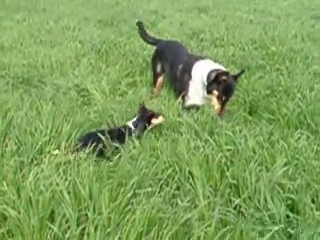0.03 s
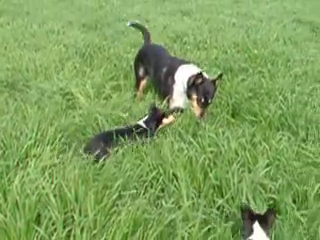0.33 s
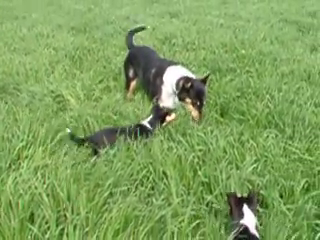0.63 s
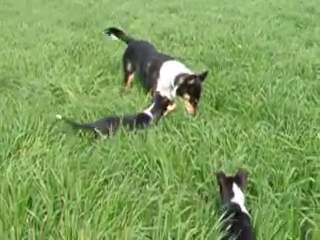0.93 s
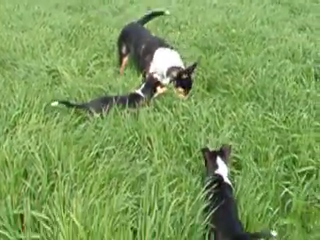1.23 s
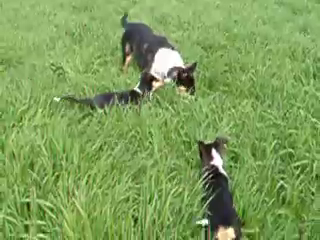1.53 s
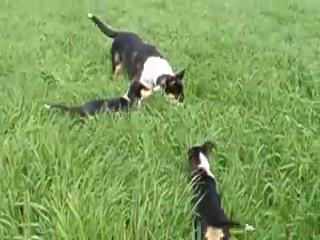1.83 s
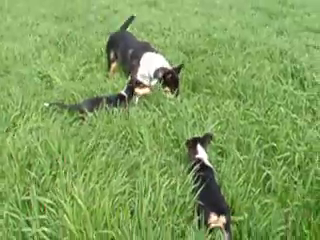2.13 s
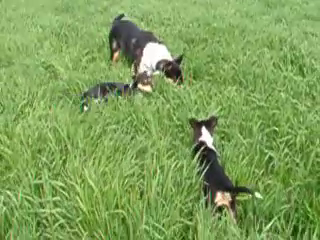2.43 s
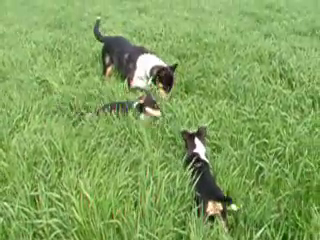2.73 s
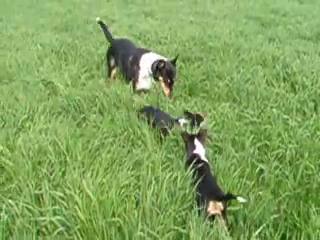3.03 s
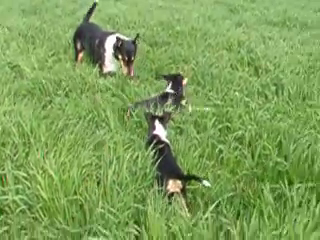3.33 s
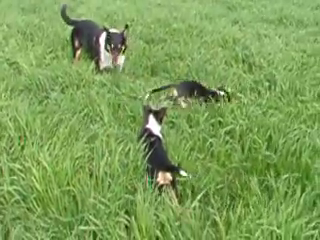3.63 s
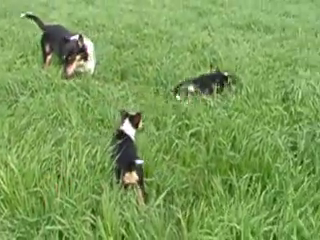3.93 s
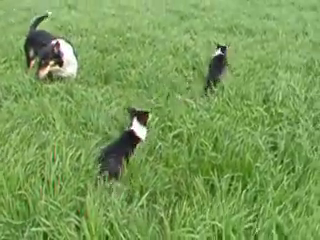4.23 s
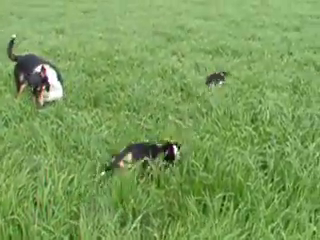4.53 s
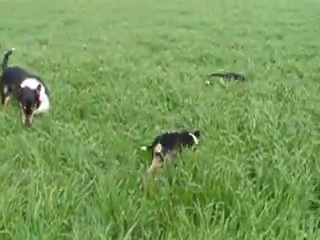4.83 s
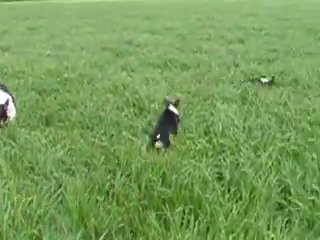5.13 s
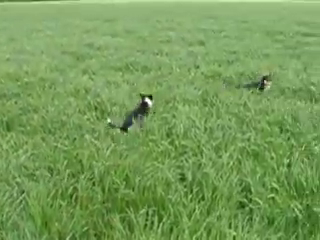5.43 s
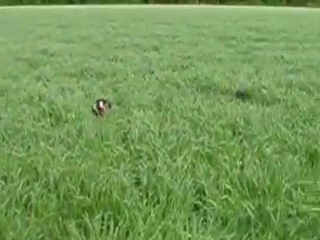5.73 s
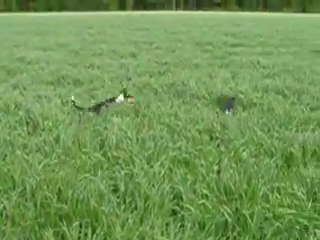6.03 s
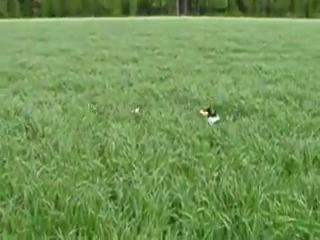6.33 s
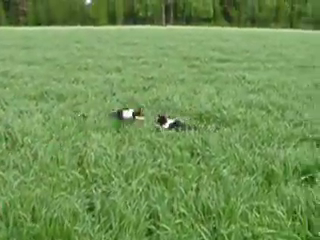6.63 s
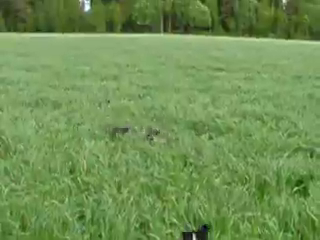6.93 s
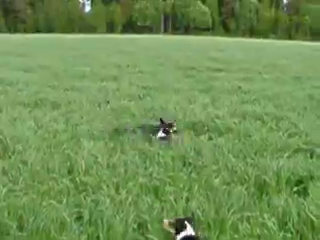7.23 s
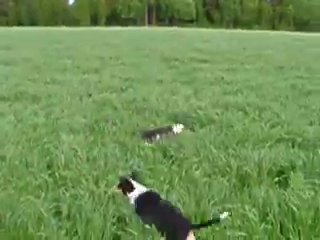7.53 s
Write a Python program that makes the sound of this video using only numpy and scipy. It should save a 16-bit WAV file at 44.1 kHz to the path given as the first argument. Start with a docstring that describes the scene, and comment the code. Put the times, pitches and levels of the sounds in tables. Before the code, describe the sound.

A quiet open field with an even hush, a faint far drone and a gritty hiss throughout. Dogs wade through tall grass, making soft, bright swishes in the first second, then thinner rustling until about 2.7 seconds. One faint, rising bird chirp sounds at 0.9 seconds. Small puffs of wind touch the microphone around 2 seconds, with low thumps near 3.1. From 4 to 5.3 seconds strong gusts rumble and buffet, the loudest sound, peaking at 4.6 and fading by 5.8. The grass keeps swishing with each stride, with scattered tiny stalk snaps, the clearest at 3.6 seconds. Soft, dull paw landings come between 5.4 and 7 seconds, and stronger swishes near 6.3 and 6.9 as the dogs bound. Light wind bumps return from 7 seconds until the end at about 7.6.

```python
"""Dogs wade and bound through tall grass: blades swish in countless tiny contacts, stalks snap,
paws land softly on turf. Gusts carry turbulence past the microphone, which rumbles and thumps.
Behind them: the hush of an open field, a far drone, one faint bird call.
The pocket camera's coarse converter adds a gritty hiss."""
import sys
import numpy as np
from scipy import signal
from scipy.fft import rfft, irfft, next_fast_len
from scipy.io import wavfile
from scipy.ndimage import uniform_filter1d, map_coordinates

SR = 44100
rng = np.random.default_rng(int(sys.argv[2]) if len(sys.argv) > 2 else 0)


def wav_out(sig):
    """Save sig, one row per channel (or a flat mono array), as 16-bit PCM at SR to the path in sys.argv[1]."""
    wavfile.write(sys.argv[1], SR, np.round(np.clip(np.atleast_2d(sig).T, -1, 1) * 32767).astype(np.int16))


N = 334719
TIME = np.arange(N) / SR


def from_db(db):
    """Decibels to gain."""
    return 10 ** (np.asarray(db) / 20)


def to_db(power):
    """Power to decibels."""
    return 10 * np.log10(power + 1e-20)


def rms_one(x):
    """Scale to rms 1."""
    return x / np.sqrt(np.mean(x ** 2) + 1e-20)


def in_time(rows):
    """Interpolate each column after t/s at every sample."""
    t_s, *columns = np.transpose(rows)
    return [np.interp(TIME, t_s, column) for column in columns]


def coloured(x, spectrum):
    """Shape x by rows of f/Hz, level/dB; rms 1."""
    hz, db = np.transpose(spectrum)
    size = next_fast_len(len(x))
    bins_hz = np.maximum(np.fft.rfftfreq(size, 1 / SR), 1)
    gain = from_db(np.interp(np.log(bins_hz), np.log(hz), db))
    return rms_one(irfft(rfft(x, size) * gain, size)[:len(x)])


def band_noise(band_hz):
    """Band-passed noise; rms 1."""
    band = signal.butter(2, band_hz, "band", fs=SR, output="sos")
    return rms_one(signal.sosfilt(band, rng.standard_normal(N)))


def drift(rate_hz):
    """Slow random wander; rms 1."""
    hop, settle = 40, 2000
    pole = np.exp(-2 * np.pi * rate_hz * hop / SR)
    noise = rng.standard_normal(N // hop + settle + 2)
    slow = signal.lfilter([1], [1, -2 * pole, pole ** 2], noise)[settle:]
    return np.interp(np.arange(N) / hop, np.arange(len(slow)), rms_one(slow))


def ring(clicks, hz, t60_s):
    """Resonator: a unit click starts a decaying unit sine."""
    r, w = from_db(-60 / (t60_s * SR)), 2 * np.pi * hz / SR
    return signal.lfilter([0, np.sin(w)], [1, -2 * r * np.cos(w), r * r], clicks + 1e-18)


def contacts(per_s, spread_db=2.0):
    """Tiny random touches of uneven strength; rms 1 at any rate."""
    chance = np.clip(per_s / SR, 1e-4, 1)
    sizes = from_db(spread_db * np.minimum(rng.exponential(1, N), 4)) * rng.choice([-1, 1], N)
    return rms_one(sizes * (rng.random(N) < chance) / np.sqrt(chance))


def field(hush_db=-53, waver_db=0.16, drone_band_hz=(370, 640)):
    """Even hush of breeze over the meadow; a dull far drone swells and sinks."""
    # breeze spectrum: f/Hz, level/dB
    hush_spectrum = [(20, -7), (70, -1.5), (160, 0), (300, -0.5), (540, -3), (800, -2.5), (1300, -4.5),
                     (2100, -5.5), (3200, -10), (6000, -16.5), (8000, -18), (10000, -51.5)]
    # drone envelope: t/s, level/dB
    drone_curve = [(0, -60.5), (.8, -63.5), (1.3, -61), (2.0, -57.5), (2.45, -58.5), (2.8, -63),
                   (4.0, -63.5), (6.0, -63), (7.59, -67)]
    hush = from_db(hush_db + waver_db * drift(3)) * coloured(rng.standard_normal(N), hush_spectrum)
    return hush + from_db(in_time(drone_curve)[0]) * band_noise(drone_band_hz)


def bird(gain_db=6.0):
    """One faint rising whistle from far trees."""
    # call contour: t/s, f/Hz, level/dB before gain
    chirp = [(.86, 3600, -81), (.878, 3400, -60), (.892, 3400, -60.5), (.9, 3900, -75), (.912, 4400, -53),
             (.93, 4850, -68), (.95, 5100, -89)]
    hz, db = in_time(chirp)
    calling = (TIME > chirp[0][0]) & (TIME < chirp[-1][0])
    return calling * from_db(db + gain_db) * np.sin(2 * np.pi * np.cumsum(hz) / SR)


def gust_db(calm_db=-60.0, rise_s=.011, fall_s=.014, inertia=.03):
    """Gusts rise out of the calm, hold and fall away; powers add."""
    # gusts: start/s, hold/s, relative level/dB
    gusts = [(1.399, 0.055, -51), (1.599, 0.038, -50), (2.059, .13, -49), (2.76, .21, -45.5),
             (3.1, 0.036, -32), (3.181, .11, -40), (3.77, .15, -44), (3.97, .57, -32), (4.029, 0.052, -26),
             (4.26, 0.079, -26), (4.35, 0.098, -23.5), (4.594, .014, -21), (4.641, .18, -28.5),
             (4.851, .07, -42), (5.029, .29, -33.5), (5.441, .36, -41.5), (5.979, .18, -54),
             (6.35, .1, -51), (6.82, .11, -45), (7.0, 0.053, -41.5), (7.147, 0.12, -44.5),
             (7.401, 0.039, -42), (7.5, 0.083, -48.5)]
    power = from_db(calm_db) ** 2
    for start_s, hold_s, db in gusts:
        lag_s = inertia * hold_s  # longer gusts swell and sink more slowly
        before = np.maximum(start_s - TIME, 0) / (rise_s + lag_s)
        after = np.maximum(TIME - start_s - hold_s, 0) / (fall_s + lag_s)
        power = power + (from_db(db) * np.exp(-np.minimum(before + after, 20))) ** 2
    return to_db(power)


def wind(gain_db=-1.0, unit_speed_db=-26.0, db_per_octave=20.0, flutter_db=2.5, puff_db=2.5):
    """Turbulence carried past the microphone: faster air is louder and higher."""
    # eddy spectrum at unit speed: f/Hz, level/dB
    turbulence = [(15, -13), (40, -3), (85, 0), (160, 1), (250, -2), (380, -10.5), (600, -23.5),
                  (1000, -31.5), (2000, -55), (4000, -85.5)]
    level_db = gust_db() + gain_db
    slowest, fastest = .33, 1.15
    speed = np.clip(2 ** ((level_db - unit_speed_db) / db_per_octave), slowest, fastest)
    eddies = coloured(rng.standard_normal(N), turbulence) * from_db(flutter_db * drift(60))
    local_power = uniform_filter1d(np.abs(signal.hilbert(eddies)) ** 2, size=1500) / 2
    eddies = eddies / np.sqrt(local_power)  # lumpy flow, steady mean strength
    passing = np.interp(np.cumsum(speed) % N, np.arange(N), eddies)
    # light air comes in puffs, strong gusts blow more evenly
    swing_db = puff_db * drift(22) * np.sqrt(slowest / speed)
    return from_db(level_db + swing_db) * passing


def buffets(gain_db=-1.0, width_cycles=0.73, steepening=2.0, wobble=0.15):
    """Hard eddies swing the pressure once or twice; strong ones have steep flanks."""
    # eddies hitting the microphone: t/s, peak/dB before gain, nominal f/Hz
    eddies = [(2.074, -35, 84), (2.185, -38.5, 84.3), (2.823, -28, 74.3), (2.906, -34, 95),
              (3.114, -20, 127), (3.132, -21.5, 140.6), (3.192, -28.5, 98.6), (3.228, -26, 107.6),
              (3.933, -24.5, 94.8), (4.064, -17, 302), (4.081, -15.5, 130), (4.261, -16.5, 140),
              (4.357, -15, 143), (4.427, -15.5, 164), (4.6, -7.5, 160.4), (4.747, -14, 210.9),
              (4.818, -19, 136), (5.11, -18.5, 149.4), (5.197, -23.5, 124.6), (5.256, -17.5, 133.7),
              (5.418, -29, 120), (5.546, -27.5, 99.9), (5.725, -29.5, 75.8), (7.007, -29, 73),
              (7.415, -27.5, 70.3)]
    out = np.zeros(N)
    warped_s = np.cumsum(np.exp(wobble * drift(140))) / SR
    for (t_s, db, hz), start_rad in zip(eddies, rng.uniform(0, 2 * np.pi, len(eddies))):
        near = np.abs(TIME - t_s) < .05
        cycles = hz * (warped_s[near] - warped_s[round(t_s * SR)])
        pressure = from_db(db + gain_db) * np.exp(-(cycles / width_cycles) ** 2)
        phase = 2 * np.pi * cycles + start_rad
        lean = np.clip(steepening * pressure, .01, .6)  # sine towards sawtooth
        out[near] += pressure * np.arctan2(lean * np.sin(phase), 1 - lean * np.cos(phase)) / lean
    return out


def paws(gain_db=-7.5, turf_band_hz=(220, 800)):
    """Each landing crushes the turf with a short dull puff."""
    # landings: t/s, level/dB before gain, decay/s
    landings = [(3.013, -42, 0.018), (5.425, -41, 0.02), (5.884, -33, 0.0072), (6.139, -43.5, 0.076),
                (6.298, -42.5, 0.038), (6.917, -39, 0.025)]
    push = np.zeros(N)
    for t_s, db, decay_s in landings:
        fade = np.exp(-np.minimum(np.abs(TIME - t_s) / decay_s, 20))
        push += from_db(db + gain_db) * (TIME >= t_s) * fade
    return push * band_noise(turf_band_hz)


def snaps(crack_hz=5800, crack_t60_s=0.0057, low_cut_hz=1050):
    """A bent stalk lets go with a dry crack and rings for milliseconds."""
    # stalks: t/s, level/dB before low cut, ring f/Hz, t60/s, crack/dB re ring
    stalks = [(.657, -41, 3480, .008, 7.5), (1.12, -35.5, 1860, 0.0091, -13),
              (1.222, -37, 4440, .005, -7.5), (1.906, -36.5, 4580, .008, -1), (3.067, -37, 1360, .016, -12),
              (3.5844, -17, 1540, 0.0023, -12), (4.707, -29, 1650, 0.0048, 1),
              (4.7071, -33, 4120, 0.0073, -3), (5.67, -33, 1674, .02, -21)]
    out = np.zeros(N)
    for t_s, db, hz, t60_s, crack_db in stalks:
        click = from_db(db) * signal.unit_impulse(N, round(t_s * SR))
        out += ring(click, hz, t60_s) + from_db(crack_db) * ring(click, crack_hz, crack_t60_s)
    # thin stalks radiate no bass
    return signal.sosfilt(signal.butter(2, low_cut_hz, "high", fs=SR, output="sos"), out)


def rustle_db(stems_re_blades_db=-7.0, rise_share=1.1, fall_share=.85):
    """Blade and stem levels: each stride swells and fades on top of steady wading."""
    # blades along the coats: t/s, relative level/dB
    wading = [(0, -51), (.5, -54.5), (1.15, -59.5), (2.3, -60), (2.7, -53.5), (3.4, -54), (4.8, -49),
              (5.6, -52), (6.5, -52.5), (7.59, -49.5)]
    # strides and bounds: crest/s, length/s, relative blade level/dB, stem level/dB
    strides = [(0.044, 0.093, -52, -57), (0.249, .08, -49.5, -55.5), (0.662, 0.032, -53.5, -57.5),
               (1.001, .1, -62, -58.5), (1.419, .08, -57.5, -65), (2.68, .05, -54, -67),
               (2.852, 0.079, -52.5, -64), (3.1, .06, -54, -54.5), (3.68, .09, -51.5, -60),
               (4.048, .05, -50.5, -63), (4.2, .05, -49.5, -51), (4.66, .07, -49.5, -53.5),
               (4.921, 0.066, -52.5, -59), (5.079, 0.035, -50.5, -56.5), (5.33, .06, -53, -57),
               (5.487, .03, -52.5, -62.5), (5.734, 0.043, -54, -60), (5.871, 0.062, -53.5, -54),
               (6.161, .06, -53, -54), (6.286, .045, -46.5, -50), (6.671, .09, -52, -58),
               (6.851, .07, -46.5, -52), (7.35, .05, -52.5, -57), (7.558, .06, -51.5, -58)]
    wading_db = in_time(wading)[0]
    blade_power = from_db(wading_db) ** 2
    stem_power = from_db(wading_db + stems_re_blades_db) ** 2
    for crest_s, length_s, swish_db, brush_db in strides:
        width_s = length_s * np.where(TIME < crest_s, rise_share, fall_share)
        push = np.exp(-np.minimum(((TIME - crest_s) / width_s) ** 2, 20))
        blade_power += push * from_db(swish_db) ** 2
        stem_power += push * from_db(brush_db) ** 2
    return to_db(blade_power), to_db(stem_power)


def grass(blade_gain_db=1.0, peak_touches_per_s=16000, patchy_db=1.0):
    """Dogs rub blades and stems in clumps; a harder push makes more contacts."""
    # bright swish of blades: f/Hz, level/dB
    blade_spectrum = [(1500, -23), (2800, -7.5), (4000, -1.5), (5000, 0), (6100, 1), (7000, -2.5),
                      (8000, -3), (9000, -12), (10000, -50.5)]
    # duller brushing of stems: f/Hz, level/dB
    stem_spectrum = [(200, -9.5), (500, -4), (1000, -4), (1900, -0.5), (2800, -2.5), (4500, -10.5),
                     (8000, -31.5)]
    swish_db, brush_db = rustle_db()
    touches_per_s = peak_touches_per_s * from_db(swish_db - np.max(swish_db))
    blades = coloured(contacts(touches_per_s), blade_spectrum)
    blades *= from_db(swish_db + blade_gain_db + patchy_db * drift(27))
    stems = coloured(contacts(touches_per_s / 2), stem_spectrum)
    stems *= from_db(brush_db + patchy_db * drift(16))
    return blades + stems


def scene(bass_cut_hz=28, overload=0.67):
    """Dry open-air mix; the microphone drops the wind's slowest swings and rounds off the hardest."""
    bass_cut = signal.butter(1, bass_cut_hz, "high", fs=SR, output="sos")
    pressure = signal.sosfilt(bass_cut, wind() + buffets())
    rumble = overload * np.tanh(pressure / overload)
    return (rumble + grass() + snaps() + paws() + bird() + field())[None]


def record(dry):
    """Camera converter: low sample rate, coarse steps, steep low-pass."""
    rate_hz, cutoff_hz = 16000, 7890
    step, bias = .0056, .0014  # re full scale
    sampled = map_coordinates(dry[0], [np.arange(0, N + 2, SR / rate_hz)], order=3, mode="nearest")
    stepped = step * np.round((sampled + bias) / step)
    low_pass = signal.firwin(13231, cutoff_hz, window=("kaiser", 9), fs=np.lcm(SR, rate_hz))
    return signal.resample_poly(stepped, SR, rate_hz, window=low_pass)[None, :N]


dry = scene()
out = record(dry)
wav_out(out)
```